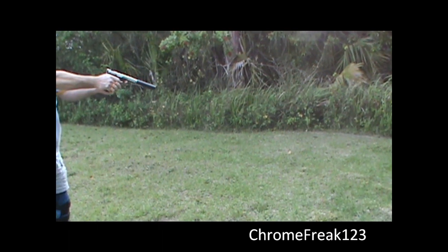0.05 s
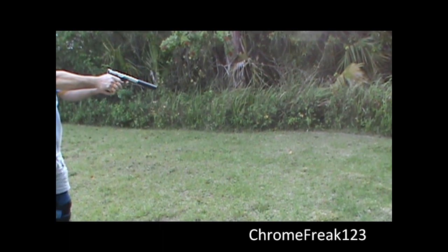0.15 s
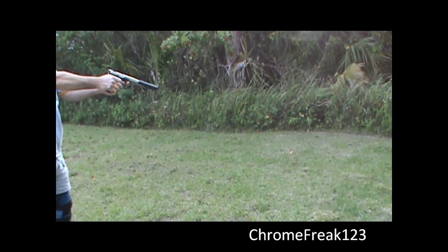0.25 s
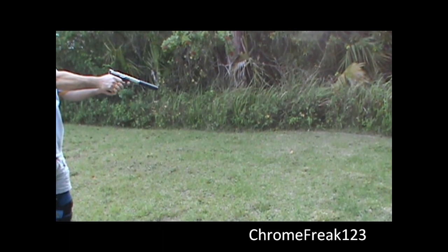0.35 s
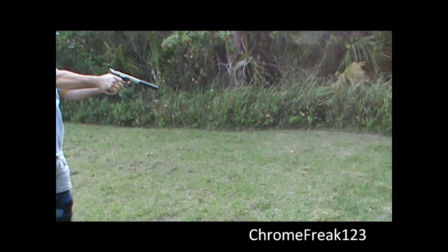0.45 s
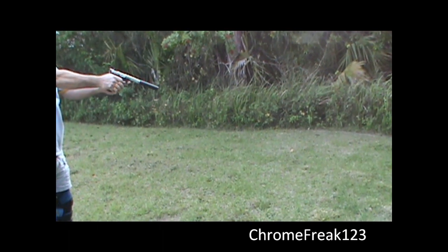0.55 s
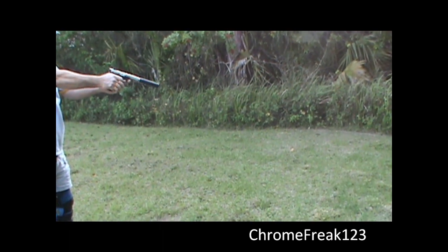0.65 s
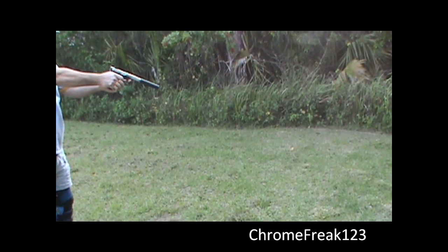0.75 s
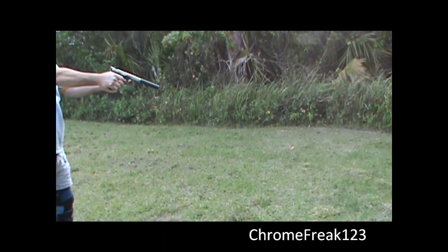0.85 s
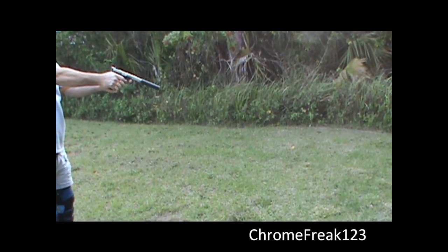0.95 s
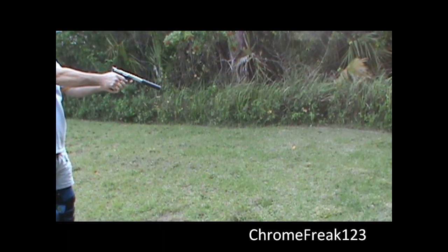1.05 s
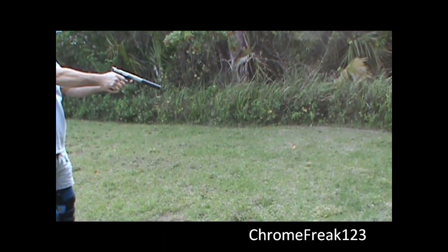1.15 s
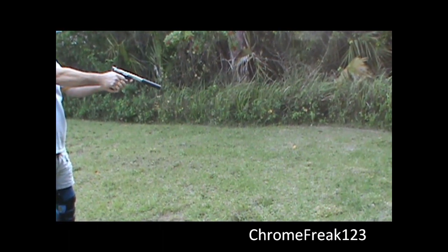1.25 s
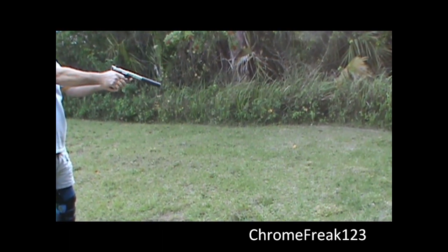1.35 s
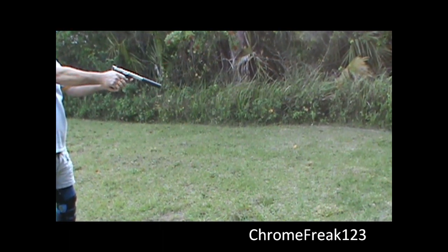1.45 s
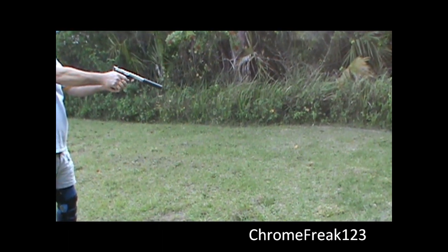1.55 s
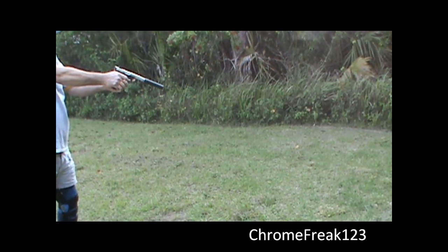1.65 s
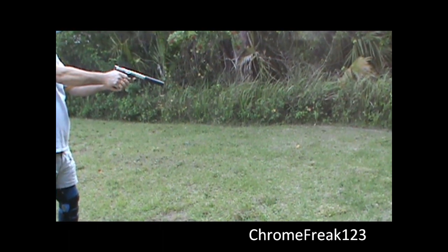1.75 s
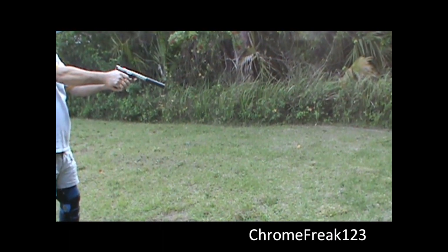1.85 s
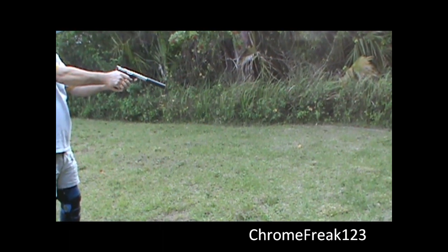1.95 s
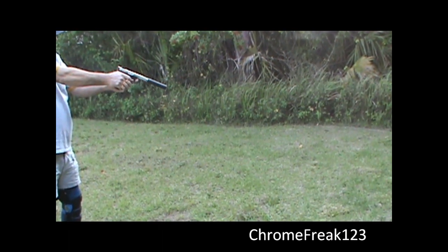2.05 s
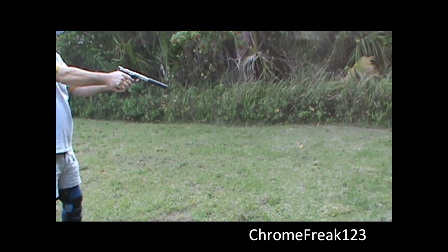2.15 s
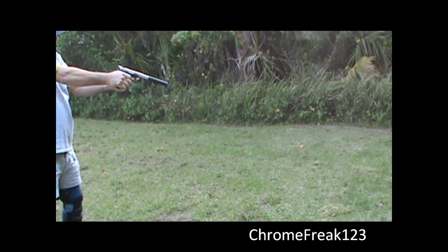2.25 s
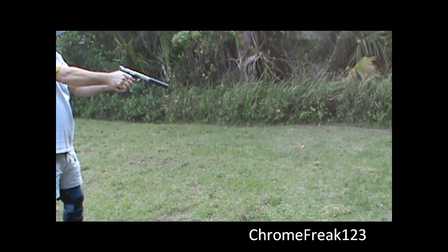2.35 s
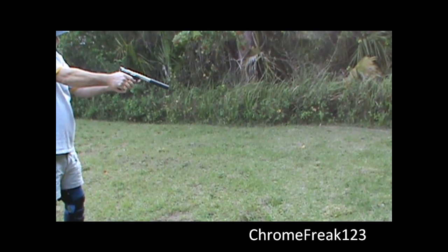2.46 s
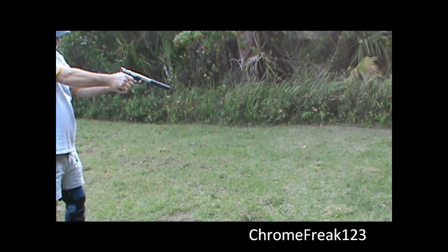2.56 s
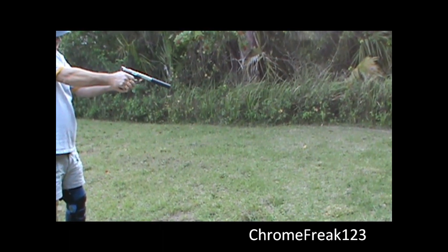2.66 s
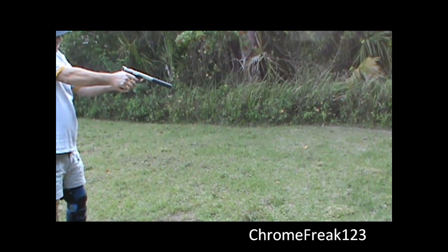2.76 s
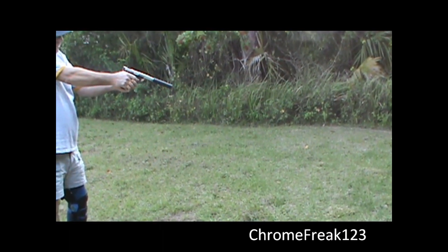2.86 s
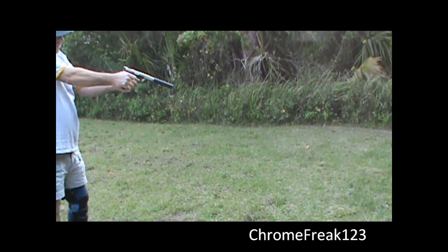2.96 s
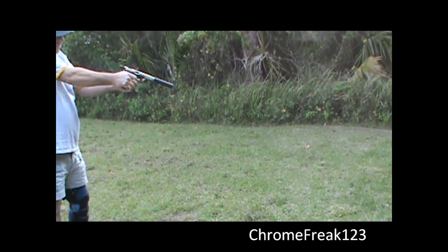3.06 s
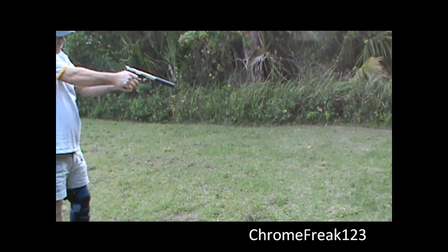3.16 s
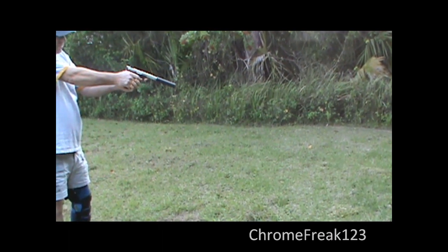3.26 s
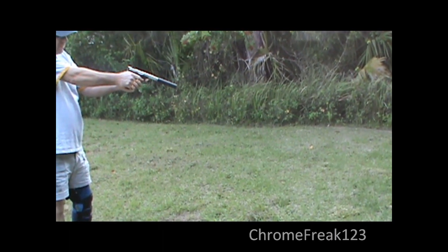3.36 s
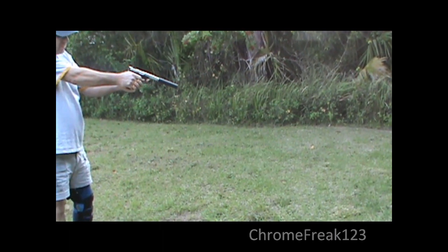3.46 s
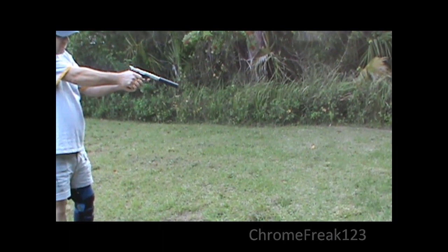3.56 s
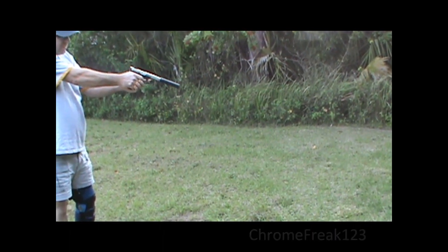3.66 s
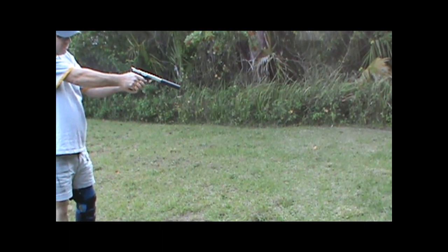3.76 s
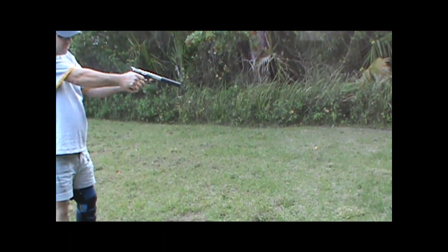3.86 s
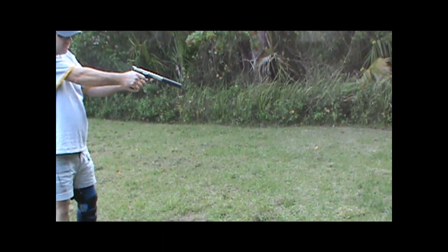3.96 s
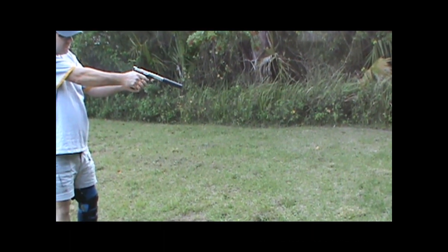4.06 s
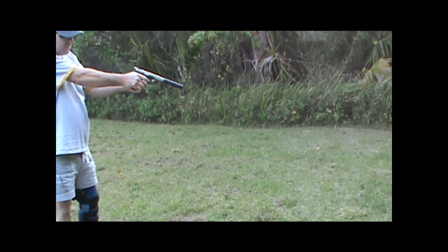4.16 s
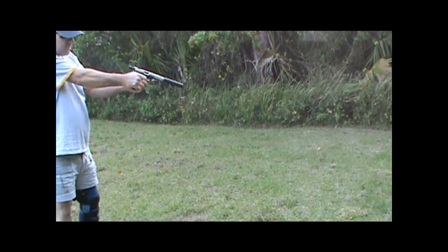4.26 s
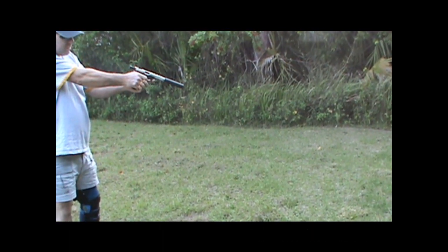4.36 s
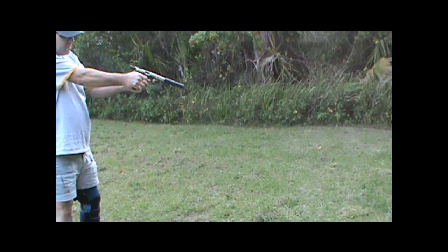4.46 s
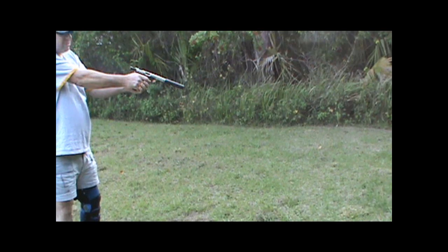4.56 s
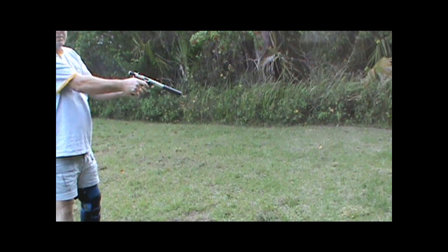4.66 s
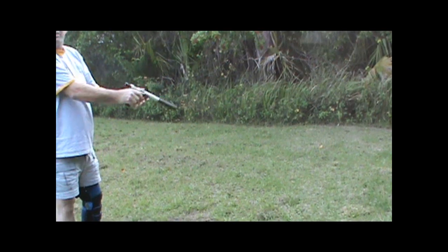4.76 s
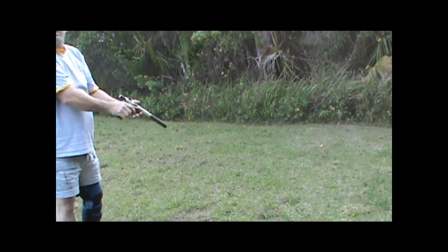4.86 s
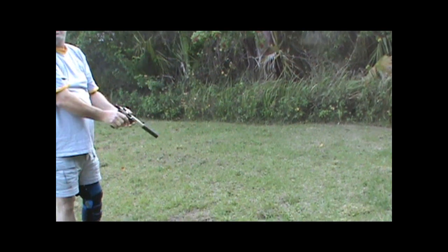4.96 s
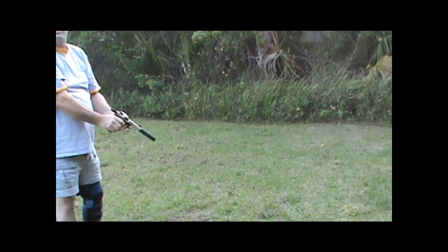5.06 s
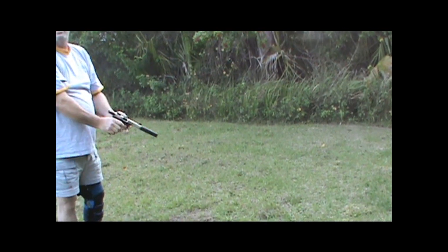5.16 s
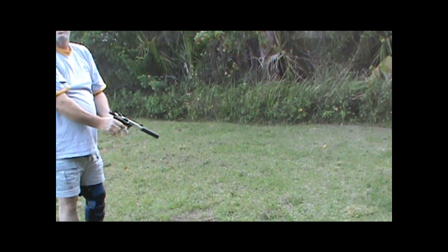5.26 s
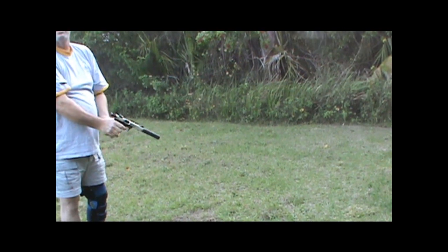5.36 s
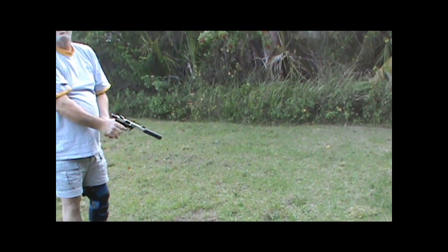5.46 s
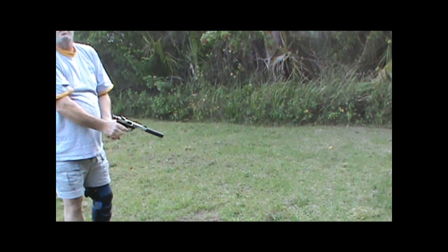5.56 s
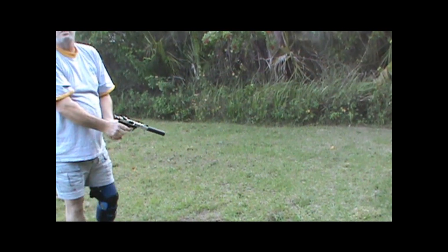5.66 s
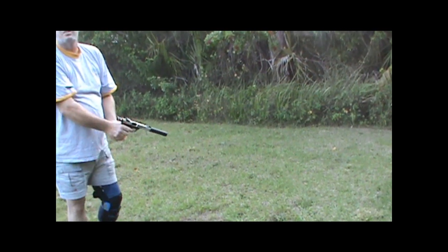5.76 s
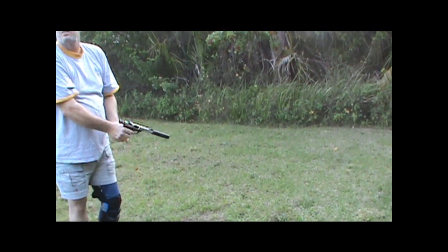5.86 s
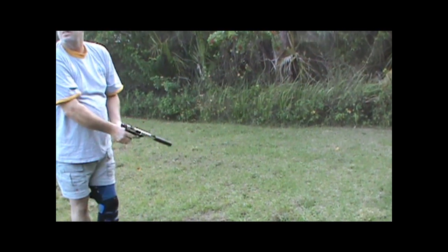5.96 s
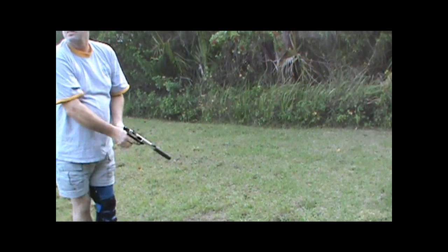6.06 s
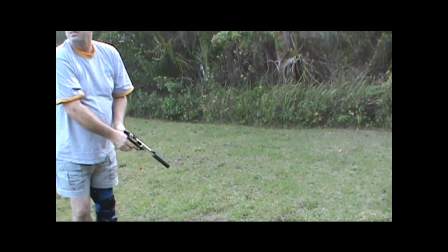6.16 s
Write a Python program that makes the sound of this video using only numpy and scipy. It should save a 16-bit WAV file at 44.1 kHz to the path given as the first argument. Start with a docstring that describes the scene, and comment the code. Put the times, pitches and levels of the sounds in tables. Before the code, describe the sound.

A small pistol with a suppressor fires nine times outdoors, close by and a little to the left, at about two shots a second. Every shot combines a puff of gas, the snap of the slide and a bullet hitting turf, then a short wash of echo from the foliage. Light handling clicks and a soft swish follow. Distant traffic, a light wind and a very faint high whine lie underneath.

```python
"""Distant traffic, breeze and a camera's faint whine sound throughout. A few small clicks come first; then
a suppressed small-bore pistol, a little to the left, fires nine shots into a lawn. In each, the hammer
ticks, gas spits out as the slide unlocks, the bullet thuds into the turf and the slide clacks home.
Grass, hedge and trees then scatter the blast back as a hissing wash with a few distinct echoes.
After the last shot the gun clicks in the hands, and a soft rustle passes."""
import sys
import numpy as np
from scipy import signal
from scipy.fft import rfft, irfft, next_fast_len
from scipy.io import wavfile
from scipy.ndimage import map_coordinates

SR = 44100
rng = np.random.default_rng(int(sys.argv[2]) if len(sys.argv) > 2 else 0)


def log_audio(samples):
    """Write samples as a 16-bit WAV file to the path given in sys.argv[1]."""
    # one column per channel
    frames = np.atleast_2d(samples).T
    # limit to full scale, then quantise
    limited = np.clip(frames, -1, 1)
    pcm = np.round(limited * 32767).astype(np.int16)
    wavfile.write(sys.argv[1], SR, pcm)


N = 273458

# distant traffic: (frequency [Hz], spectral level [dB])
TRAFFIC_SPECTRUM = [(13, -51), (22, -15.5), (76, -5), (93, -2.5), (107, -9.5), (129, -3.5), (205, -6),
                    (390, -10.5), (436, -6.5), (460, -6), (553, -4.5), (607, -5), (690, -3), (1420, -20.5),
                    (1800, -33), (2340, -46), (3960, -120)]
# far machinery: (frequency [Hz], width [Hz], level before the swells [dB])
DRONE_BANDS = [(471.5, 12, -66.5), (548, 14, -65)]
# the drone drifts in and out: (peak time [s], width [s], gain [dB])
DRONE_SWELLS = [(.05, 0.5, 10), (4.2, 1, 6)]
# wind in the leaves: (frequency [Hz], spectral level [dB])
BREEZE_SPECTRUM = [(710, -8), (1200, 0), (1420, -4.5), (1690, 0), (3250, -3.5), (3650, -5.5), (6370, -4),
                   (8240, -16), (14200, -20), (15500, -12.5)]
# gusts of wind: (peak time [s], width [s], level [dB])
GUSTS = [(.35, 0.51, -61), (3.8, 1, -68.5), (6.15, 0.16, -67)]
# faint dull rustles: (peak time [s], width [s], level [dB])
STIRS = [(.275, 0.019, -58), (.68, .015, -59), (1.75, 0.038, -59)]
# trigger, catch and slide: (time [s], relative level [dB], centre [Hz], decay by 60 dB [s])
HANDLING_CLICKS = [(0.134, -56, 6300, 0.033), (0.459, -71, 6000, 0.12), (.909, -39, 9000, .012),
                   (1.579, -38, 9000, .012), (2.023, -42, 9000, .012), (3.575, -60, 6000, 0.02),
                   (3.582, -66, 4030, 0.019), (3.932, -56, 5000, 0.0065), (4.678, -44.5, 2880, 0.013),
                   (5.109, -58, 6940, .04), (5.124, -65, 7160, 0.045), (5.215, -55, 6450, 0.02),
                   (5.6624, -45.5, 2050, 0.0097), (5.664, -50.5, 3900, 0.0061)]
# ring of the lightly touched gun: (frequency [Hz], width [Hz], level [dB])
HANDLING_MODES = [(1900, 120, 7), (3200, 520, -1), (4020, 590, 0), (6100, 850, -2), (9400, 1000, -9.5),
                  (11500, 2100, -11.5)]
# scatter from trunks: (frequency [Hz], spectral level [dB])
TRUNK_SPECTRUM = [(40, -35), (110, -2), (250, -7), (520, 2.5), (850, 0.5), (1150, -7), (2000, -20.5)]
# scatter from grass: (frequency [Hz], spectral level [dB])
GRASS_SPECTRUM = [(1500, -32), (3200, 1.5), (6000, 7), (9500, 5.5), (13000, 5.5), (16000, -9)]
# scatter from leaves: (frequency [Hz], spectral level [dB])
LEAF_SPECTRUM = [(590, -41), (1000, -13.5), (2250, -5.5), (2810, -5), (3340, -2), (4020, -5.5),
                 (5310, -0.5), (5700, -0.5), (8070, -1.5), (9490, -0.5), (12000, -3.5), (15100, -12),
                 (16000, -12)]
# extra fading among the leaves: (frequency [Hz], loss [dB/s])
LEAF_LOSS = [(1500, -2.5), (3500, 22.5), (6000, 23), (9800, 41), (12500, 80), (15000, 89)]
# trunks, fence and walls: (delay [s], gain [dB], centre [Hz], width [octaves], left minus right [dB])
REFLECTORS = [(.0490, 0, 760, 1, -5), (.0575, 0, 640, 0.49, -2), (.0668, 7, 855, 0.23, -5),
              (0.0709, 7, 2520, 0.31, -7), (.0718, 3.5, 6000, 0.35, -10), (0.074, -1.5, 5500, .6, -4),
              (.111, -5.5, 260, 0.7, 0), (0.1136, -6.5, 4250, 0.66, 21)]
# a bullet striking turf: (frequency [Hz], spectral level [dB])
TURF_SPECTRUM = [(300, -36), (1400, 11), (3200, 10), (6000, -36), (16000, 1)]
# hammer, unlocking, rear stop, feed, slide home:
# (delay [s], relative level [dB], decay by 60 dB [s], treble gain [dB])
ACTION_CONTACTS = [(-.0031, -17, 0.01, -14.5), (.0019, 4, 0.0037, -0.5), (.0079, 2.5, 0.0071, 3),
                   (0.02, -5.5, .006, 27), (0.0244, -2, 0.014, 6)]
# ring of slide and frame: (frequency [Hz], width [Hz], level [dB])
STEEL_MODES = [(1910, 62, 8.5), (3010, 236, 10.5), (4860, 820, 5), (6180, 1330, 7.5), (6900, 370, 2),
               (9300, 790, 5.5), (10050, 570, 7.5), (11700, 1450, 4)]
# gas leaving the suppressor: (frequency [Hz], spectral level [dB])
GAS_SPECTRUM = [(150, -7), (1100, -7), (1900, -0.5), (2900, -2.5), (4000, 0.5), (5400, -1.5), (7200, -1.5),
                (9500, -6), (13000, -3.5), (16000, -46)]
# shots: (time [s], gain [dB], jet whistle [Hz], whistle gain [dB], wash gain [dB], top hiss gain [dB],
# thud gain [dB], soil heave gain [steps of 2 dB])
SHOTS = [(0.7394, -27, 3450.0, 3.5, 1.9, 0.5, -7.5, -9), (1.4097, -27, 4300, 5.5, -0.4, 2.5, -7.5, -5),
         (1.854, -28.5, 5340.0, 2.5, 0.56, 0.5, -8, -9), (2.3382, -28.5, 3120, 1.5, 0.66, 1, -13, -12),
         (2.6955, -27.5, 6100, 6.5, 0.1, -1, -7, -6), (3.1815, -28.5, 6840, 1.5, -0.6, 1.8, -8.5, 0),
         (3.6062, -26, 5950, 2.5, -0.5, 3, -8, -4), (3.9556, -28, 7860, 1.3, 0.6, 0.5, -7, -8),
         (4.3431, -27, 5530, 4.5, -0.4, 1.5, -5, 6)]
# likeness of diffuse sound at the two microphone ports: (frequency [Hz], coherence [ratio])
PORT_COHERENCE = [(100, 0.98), (600, 0.91), (1600, 0.45), (3300, 0.36), (6000, 0.31), (11000, 0.62)]
# imbalance of the ports: (frequency [Hz], left minus right [dB])
PORT_LEVEL = [(60, 0), (99, -0.5), (160, -1), (270, -0.5), (450, -2.5), (740, -0.5), (1220, 0), (2010, 1.5),
              (3330, 1.5), (5500, -3.5), (9080, 2.5), (15000, 2.5)]
# phase between the ports: (frequency [Hz], lead of the left [rad])
PORT_PHASE = [(100, 0.004), (600, 0.3), (1700, 0.93), (3600, 0.92), (5000, -0.1), (6800, -0.85),
              (8500, 0.1), (13000, 0.45)]


def amp(db):
    """Amplitude grows tenfold every 20 dB."""
    return 10 ** (np.asarray(db) / 20)


def unit(x):
    """Normalisation to rms 1."""
    return x / np.sqrt(np.mean(x ** 2) + 1e-20)


def along(points, hz):
    """Interpolation of (frequency, value) points on a log-frequency axis."""
    knots_hz, values = np.transpose(points)
    return np.interp(np.log(hz + 1), np.log(knots_hz + 1), values)


def spectrum(points):
    """Spectral envelope: gain as a function of frequency, from points in dB."""
    return lambda hz: amp(along(points, hz))


def swell(t, peak_s, width_s, db):
    """Gaussian envelope: a smooth rise and fall."""
    return amp(db) * np.exp(-.5 * ((t - peak_s) / width_s) ** 2)


def bell(hz, centre_hz, octaves):
    """Gaussian passband of height 1 on a log-frequency axis."""
    return np.exp(-.5 * (np.log2((hz + 1) / centre_hz) / octaves) ** 2)


def filtered(x, response):
    """Linear filtering: the spectrum of x times a frequency response."""
    n = x.shape[-1]
    padded = next_fast_len(n + 4096)
    return irfft(rfft(x, padded) * response(np.fft.rfftfreq(padded, 1 / SR)), padded)[..., :n]


def diffuse(gain, size):
    """Diffuse field: noise from all sides is only partly coherent at two points. Stereo, rms 1."""
    def mid_and_side(hz):
        angle = np.arccos(np.clip(along(PORT_COHERENCE, hz), -1, 1)) / 2
        return gain(hz) * np.array([np.cos(angle), np.sin(angle)])
    mid, side = filtered(rng.standard_normal((2, size)), mid_and_side)
    return unit(np.array([mid + side, mid - side]))


def panned(x, left_db):
    """A level difference between the channels gives direction."""
    return amp([[left_db / 2], [-left_db / 2]]) * x


def add(track, start_s, sound):
    """Superposition: a sound adds to the track from its start time."""
    part = track[..., max(round(start_s * SR), 0):][..., :sound.shape[-1]]
    part += sound[..., :part.shape[-1]]


def resonances(modes, hz):
    """Modal summation: damped resonators of alternating sign."""
    return sum((-1) ** k * amp(db) * 1j * hz * width / (centre ** 2 - hz ** 2 + 1j * hz * width)
               for k, (centre, width, db) in enumerate(modes))


def contact(response, t60, rise_s=0.00063):
    """Impact excitation: a dying chatter of tiny taps rings the steel's modes."""
    t = np.arange(SR // 10) / SR
    envelope = amp(-60 * t / max(t60, .002)) * (1 - np.exp(-t / rise_s))
    taps = np.sign(rng.standard_normal(len(t))) * envelope
    return filtered(taps, lambda hz: unit(response(hz)))


def push(hz, cycles):
    """Heavily damped oscillation: a pressure pulse whose envelope peaks after the given cycles."""
    elapsed_cycles = np.arange(SR // 10) / SR * hz
    age = elapsed_cycles / cycles
    return np.sin(2 * np.pi * elapsed_cycles) * age * np.exp(1 - age)


def outdoors(traffic_db=-51, calm_db=-65.5, hiss_db=-67):
    """Ambient noise: traffic, machinery, wind in leaves and soft rustles add as independent fields."""
    t = np.arange(N) / SR
    traffic = amp(traffic_db) * diffuse(spectrum(TRAFFIC_SPECTRUM), N)
    drone = sum(amp(db) * diffuse(lambda hz: np.exp(-2 * ((hz - centre) / width) ** 2), N)
                for centre, width, db in DRONE_BANDS)
    drone *= sum(swell(t, *row) for row in DRONE_SWELLS)
    wind = amp(calm_db) + sum(swell(t, *gust) for gust in GUSTS)
    breeze = wind * diffuse(spectrum(BREEZE_SPECTRUM), N)
    swish = swell(t, peak_s=5.96, width_s=0.1, db=-60)
    hiss = (amp(hiss_db) + swish) * diffuse(lambda hz: bell(hz, 8100, 1.2), N)
    stirs = sum(swell(t, *row) for row in STIRS) * diffuse(lambda hz: bell(hz, 1900, 0.46), N)
    return traffic + drone + breeze + hiss + stirs


def camera(whine_db=-73, whine_hz=6240, pulse_hz=29.97, tone_db=-80, tone_hz=15734):
    """Amplitude modulation: the camera's drive whines in pulses, beside a thin steady tone."""
    t = np.arange(N) / SR
    pulses = unit(np.clip(3 * np.sin(2 * np.pi * pulse_hz * (t - 0.0051)), 0, 1))
    phase_drift = np.cumsum(rng.normal(0, 0.031, N))
    whine = unit(np.sin(2 * np.pi * whine_hz * t + phase_drift))
    tone = unit(np.sin(2 * np.pi * tone_hz * t))
    return amp(whine_db) * pulses * whine + amp(tone_db) * tone


def handling(gain_db=4):
    """Selective excitation: light touches ring only the gun's high modes."""
    out = np.zeros(N)
    for start_s, db, centre_hz, t60 in HANDLING_CLICKS:
        touch = lambda hz: bell(np.minimum(hz, centre_hz), centre_hz, .33) / (1 + hz / centre_hz)
        click = contact(lambda hz: resonances(HANDLING_MODES, hz) * touch(hz), t60, rise_s=0.002)
        add(out, start_s, amp(db + gain_db) * click)
    return out


def scatter(t, near_s, rise_s, far_s, fade_db_per_s):
    """Spread of path lengths: scatter builds from the nearest plants, holds to the farthest, fades."""
    attack = 1 - np.exp(-np.maximum(t - near_s, 0) / rise_s)
    return attack * amp(-fade_db_per_s * np.maximum(t - far_s, 0))


def foliage(t, grain_db=1.5, grain_hz=700):
    """Attenuation with distance: longer paths through leaves lose more treble. The level flickers."""
    size = len(t)
    hz, delay, spectra = signal.stft(diffuse(spectrum(LEAF_SPECTRUM), size), SR, nperseg=256)
    spectra *= amp(-along(LEAF_LOSS, hz)[:, None] * delay)
    leaves = signal.istft(spectra, SR, nperseg=256)[1][:, :size]
    flicker = map_coordinates(rng.standard_normal(size // 40), [t * grain_hz], order=1, mode="mirror")
    return amp(grain_db * flicker) * leaves


def jet_colour(wash, whistle_hz, whistle_db, top_db, ripple_db=1.9, ripple_step_hz=90):
    """Scatter inherits its source's spectrum: each gas jet has its own whistle and narrow rings."""
    ripple = rng.standard_normal(400)
    rings = lambda hz: ripple_db * map_coordinates(ripple, [hz / ripple_step_hz], mode="mirror")
    peaks = lambda hz: whistle_db * bell(hz, whistle_hz, .17) + top_db * bell(hz, 14000, .35)
    return filtered(wash, lambda hz: amp(peaks(hz) + rings(hz)))


def hedge(leaves_db=-27.5, trunks_db=-38.5, grass_db=-27, grass_peak_s=0.05):
    """Backscatter of the blast: alike each time from still trunks, always new from grass and leaves."""
    out, size = np.zeros((2, N)), SR * 2 // 3
    t = np.arange(1, size + 1) / SR
    trunk_envelope = scatter(t, near_s=.037, rise_s=0.0038, far_s=0.11, fade_db_per_s=131)
    leaf_envelope = scatter(t, near_s=0.00049, rise_s=0.019, far_s=0.11, fade_db_per_s=110)
    grass_envelope = np.exp(-.5 * (np.log(t / grass_peak_s) / 0.28) ** 2)
    trunks = amp(trunks_db) * trunk_envelope * diffuse(spectrum(TRUNK_SPECTRUM), size)
    for start_s, _, whistle_hz, whistle_db, wash_db, top_db, *_ in SHOTS:
        grass = amp(grass_db) * grass_envelope * diffuse(spectrum(GRASS_SPECTRUM), size)
        leaves = amp(leaves_db) * leaf_envelope * foliage(t)
        wash = jet_colour(grass + leaves, whistle_hz, whistle_db, top_db)
        add(out, start_s, amp(wash_db) * wash + trunks)
    return out


def echoes(blast):
    """Reflection: trunks, fence and walls each return the band that suits their size."""
    out = np.zeros((2, N))
    for delay, db, centre_hz, octaves, left_db in REFLECTORS:
        echo = amp(db) * filtered(blast, lambda hz: bell(hz, centre_hz, octaves))
        add(out, delay, panned(echo, left_db))
    return out


def bullets(smack_db=-25, smack_t60=0.0055, dent_db=-31):
    """Inelastic impact: each bullet smacks and dents the turf, thuds into it and heaves the soil."""
    out, t = np.zeros(N), np.arange(SR // 10) / SR
    for start_s, *_, thud_db, heave_steps in SHOTS:
        noise = unit(filtered(rng.standard_normal(len(t)), spectrum(TURF_SPECTRUM)))
        smack = amp(smack_db - 60 * t / smack_t60) * noise
        add(out, start_s + .017, smack + amp(dent_db) * push(hz=650, cycles=0.8))
        add(out, start_s + 0.01827, amp(thud_db - 22.5) * push(hz=330, cycles=0.49))
        add(out, start_s + 0.0198, amp(2 * heave_steps - 50) * push(hz=130, cycles=0.69))
    return out


def action(gain_db=3, force_spread_db=0.64, jitter_s=0.00017):
    """Free vibration: hammer and slide strike the steel in the same cycle each shot, a little unevenly."""
    out = np.zeros(N)
    for start_s, shot_db, *_ in SHOTS:
        for delay, contact_db, t60, treble_db in ACTION_CONTACTS:
            force = amp(shot_db + gain_db + contact_db + rng.normal(0, force_spread_db))
            steel = lambda hz: resonances(STEEL_MODES, hz) * amp(treble_db * bell(hz, 13000, 0.84))
            add(out, start_s + delay + rng.normal(0, jitter_s), force * contact(steel, t60))
    return out


def muzzle_blasts(bore_hz=560, breech_hz=660):
    """Sudden expansion: gas spits from the suppressor, with low puffs from the bore and the breech."""
    out, t = np.zeros(N), np.arange(SR // 10) / SR
    for start_s, shot_db, *_ in SHOTS:
        gas = unit(filtered(rng.standard_normal(len(t)), spectrum(GAS_SPECTRUM)))
        gas *= swell(t, peak_s=0.00467, width_s=0.00096, db=4)
        add(gas, .0025, amp(-4) * push(bore_hz, cycles=0.31))
        add(gas, .0049, -amp(-1) * push(breech_hz, cycles=0.31))
        add(out, start_s, amp(shot_db) * gas)
    return out


def scene():
    """Direct and reflected sound add; only the blast is aimed at the trees and returns from them."""
    blast = muzzle_blasts()
    gun = blast + action() + handling()
    # the gun's place on the left shows mostly in its treble
    bass = filtered(gun, lambda hz: 1 / (1 + (hz / 1000) ** 2))
    direct = panned(bass, left_db=1.5) + panned(gun - bass, left_db=5.5)
    reflected = echoes(blast) + hedge()
    return direct + bullets() + reflected + outdoors() + camera()


def record(dry, limit_hz=15900):
    """Transfer function: two microphone ports differ in gain and phase, under a steep band limit."""
    sides = np.array([[.5], [-.5]])
    gain = lambda hz: amp(sides * along(PORT_LEVEL, hz))
    phase = lambda hz: np.exp(1j * sides * along(PORT_PHASE, hz))
    return filtered(dry, lambda hz: gain(hz) * phase(hz) / np.sqrt(1 + (hz / limit_hz) ** 400))


dry = scene()
out = record(dry)
log_audio(out)
```